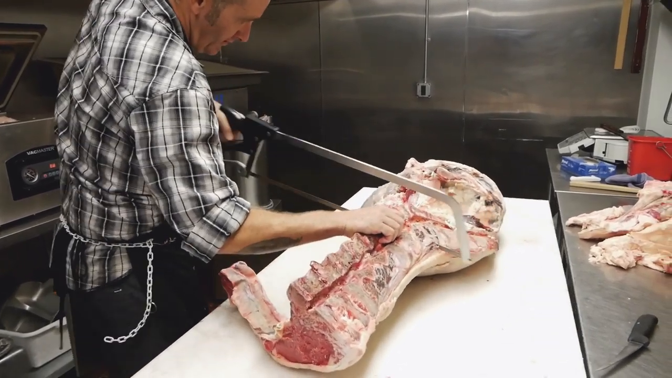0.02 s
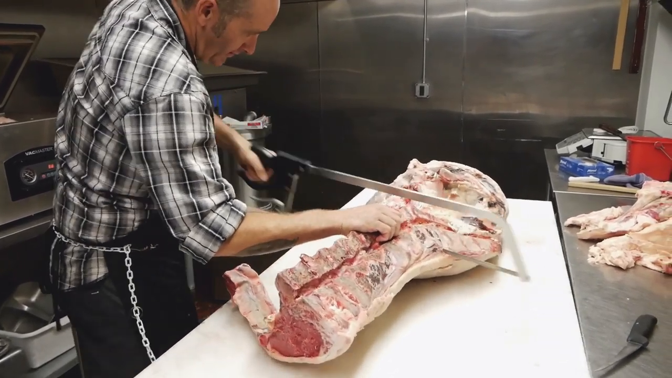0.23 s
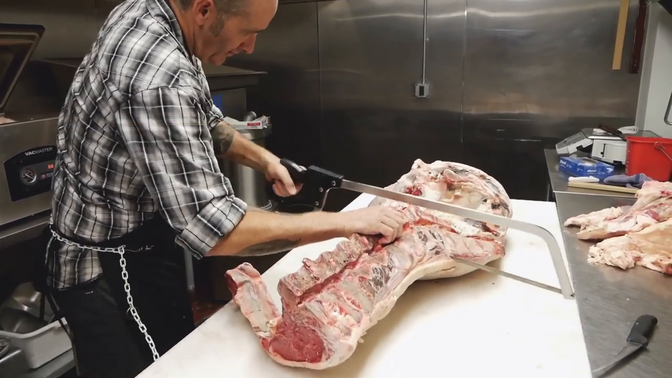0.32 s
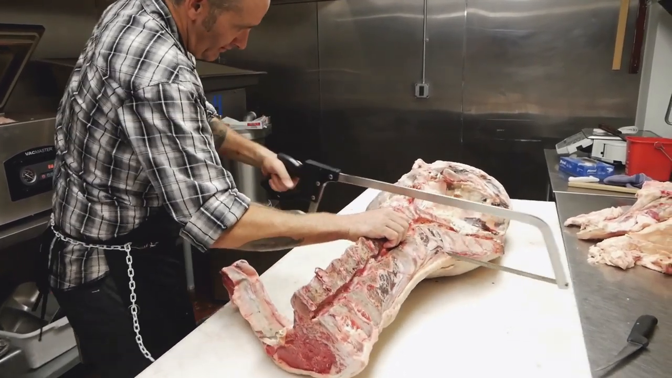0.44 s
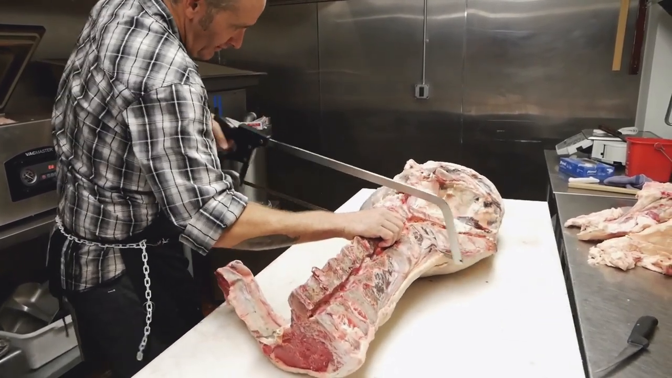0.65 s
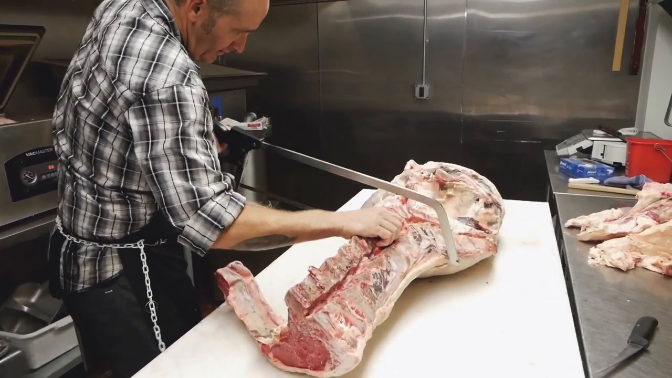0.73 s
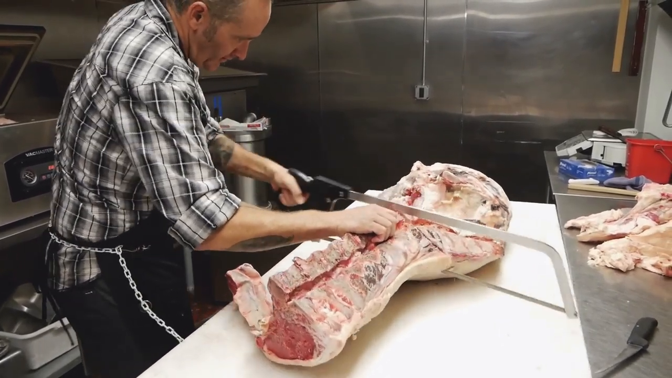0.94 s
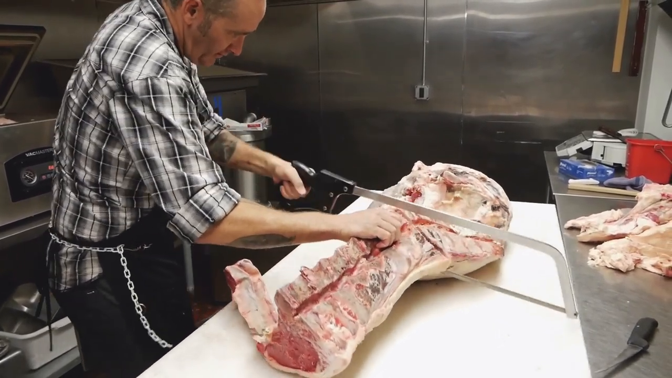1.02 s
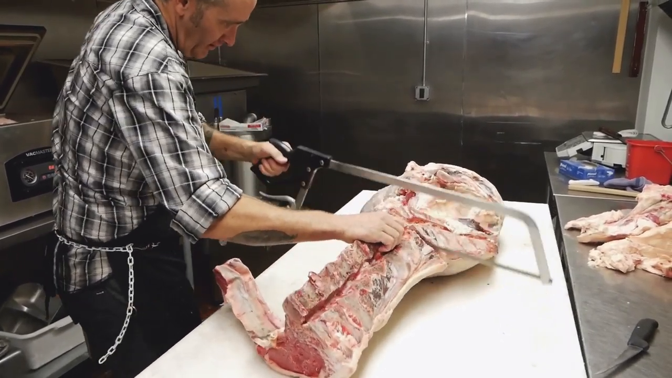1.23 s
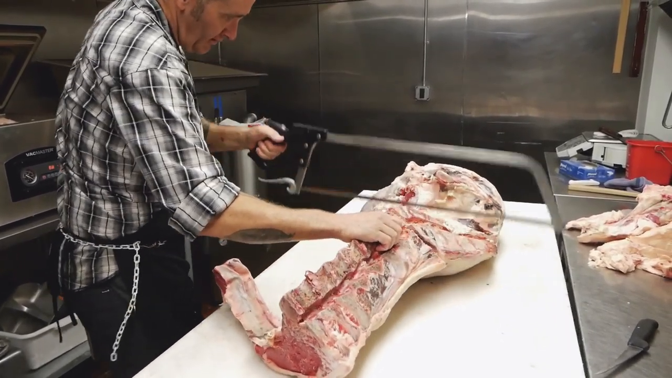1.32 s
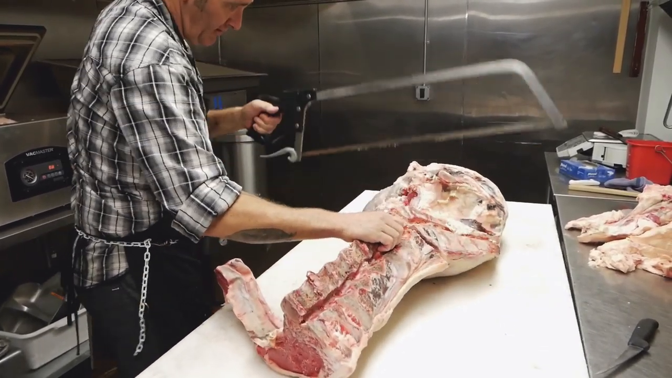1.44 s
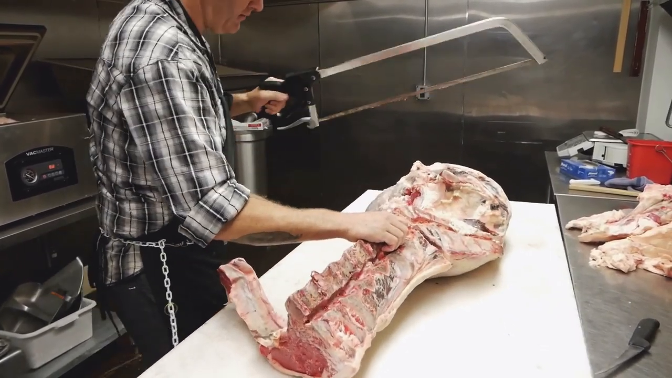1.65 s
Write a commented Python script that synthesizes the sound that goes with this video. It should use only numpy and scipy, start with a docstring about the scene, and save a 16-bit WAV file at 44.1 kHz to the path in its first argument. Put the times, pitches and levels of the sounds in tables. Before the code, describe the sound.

A hand saw cuts bone, close and nearly mono, in a hard steel-walled room with steady low cooler hum. A faint drag opens; from 0.2 to 0.4 seconds a loud, crunchy push rings and squeals. A sharp snag cracks at 0.44, then light gritty skating until 0.8. A second, brighter but weaker push fades into a short knock at 1.02. A soft sinking scuff comes at 1.52.

```python
"""In a steel-walled butcher's room a hand saw cuts through bone: two loud pushes, each after a light pull back.
The teeth strike at a rate set by the blade's speed: noise bursts crunch the bone, resonances ring the blade
and low noise shakes the carcass. The blade catches and squeals in short tones, then breaks through with a
knock of decaying modes and is lifted away; a soft scuff of noise and a sinking tone follows.
Coolers run throughout as coloured noise and wavering tones; a noise tail answers for the room."""
import sys
import numpy as np
from scipy import signal
from scipy.fft import rfft, irfft, next_fast_len
from scipy.io import wavfile
from scipy.ndimage import uniform_filter1d, map_coordinates

SR = 44100
rng = np.random.default_rng(int(sys.argv[2]) if len(sys.argv) > 2 else 0)


def master(y):
    """Save y as 16-bit WAV."""
    cut = np.clip(np.atleast_2d(y).T, -1, 1)
    pcm = np.round(cut * 32767)  # scale
    wavfile.write(sys.argv[1], SR, pcm.astype(np.int16))


N = 74970


def amp(db):
    """Decibels to gain."""
    return 10 ** (np.asarray(db) / 20)


def unit(x):
    """Scale to rms 1."""
    return x / np.sqrt(np.mean(x ** 2) + 1e-20)


def along(points, hz):
    """Read (f/Hz, value) points along a log frequency axis."""
    f, v = np.transpose(points)
    return np.interp(np.log(hz + 1), np.log(f + 1), v)


def curves(rows):
    """One value per sample for each column after the time."""
    s, *cols = np.transpose(rows)
    return [np.interp(np.arange(N) / SR, s, c) for c in cols]


def wobble(rate):
    """A smooth random curve with rate knots a second."""
    knots = rng.standard_normal(int(N * rate / SR) + 4)
    return map_coordinates(knots, [np.arange(N) * rate / SR])


def filtered(x, response):
    """Filter x by a response given as a function of frequency."""
    m = next_fast_len(N + SR // 2)
    return irfft(rfft(x, m) * response(np.fft.rfftfreq(m, 1 / SR)), m)[..., :N]


def coloured(x, points):
    """Shape x by (f/Hz, level/dB) points, at rms 1."""
    return unit(filtered(x, lambda hz: amp(along(points, hz))))


def resonance(f, hz, width_hz):
    """Frequency response of one resonant mode."""
    return 1j * f * width_hz / (hz * hz - f * f + 1j * f * width_hz)


def decay(start, t60):
    """Silence, then a sudden start that dies away by 60 dB in t60 seconds."""
    t = np.arange(N) / SR - start
    return (t >= 0) * amp(-60 * np.maximum(t, 0) / t60)


def ring(start, hz, t60):
    """One struck mode: a decaying sine."""
    return decay(start, t60) * np.sin(2 * np.pi * hz * (np.arange(N) / SR - start))


def swell(s, hz, width_s):
    """A tone that rises and fades around a moment."""
    t = np.arange(N) / SR - s
    return np.exp(-(t / width_s) ** 2) * np.sin(2 * np.pi * hz * t + .5 * wobble(160))


def coolers():
    """Fan rush as coloured noise, and motor tones that waver in level and phase."""
    # fan spectrum: f/Hz, level/dB
    fan_colour = [(30, 1), (45, -4.5), (100, -1.5), (140, 2), (230, 2.5), (340, -4.5), (420, -5.5),
                  (500, -14), (700, -15.5), (2600, -27.5), (3600, -34.5), (5000, -34), (9000, -45.5)]
    # motor tones: f/Hz, level/dB
    motor_tones = [(209, -46.5), (236, -47), (411, -51.5)]
    fan_db, waver_db = -41.5, 1
    t = np.arange(N) / SR
    hum = np.zeros(N)
    for hz, db in motor_tones:
        level = amp(db + waver_db * wobble(9.5))
        hum += level * np.sin(2 * np.pi * hz * t + 0.8 * wobble(9))
    return amp(fan_db) * coloured(rng.standard_normal(N), fan_colour) + hum


def room(x):
    """The hard walls answer with a noise tail whose treble dies first."""
    # reverberation: f/Hz, t60/s
    reverb_times = [(4000, 0.5), (8000, 0.44), (14000, .25)]
    room_db, first_wall_s = -6, 0.0024
    hz, t, z = signal.stft(rng.standard_normal(SR * 2 // 3), SR, nperseg=256)
    fade = amp(-60 * t / along(reverb_times, hz)[:, None])
    tail = signal.istft(z * fade, SR, nperseg=256)[1]
    tail = tail * (np.arange(len(tail)) / SR > first_wall_s)
    return amp(room_db) * signal.fftconvolve(x, tail / np.linalg.norm(tail))[:N]


def lift():
    """A soft noise scuff with a sinking hollow resonance as the saw is raised."""
    # scuff envelope: t/s, level/dB
    scuff = [(1.512, -67), (1.519, -43), (1.545, -39), (1.575, -45), (1.61, -53), (1.7, -62.5)]
    # scuff spectrum: f/Hz, level/dB
    scuff_colour = [(300, 2.5), (900, 2), (1200, -13), (1650, -7), (2900, -15.5), (4500, -9.5), (6500, -12),
                    (13000, -30.5)]
    start_hz, octaves_per_s, hollow_db = 1000, 8, -6
    level_db, = curves(scuff)
    sinking_s = np.maximum(np.arange(N) / SR - scuff[1][0], 0)
    hz = start_hz * 2 ** (-octaves_per_s * sinking_s)
    hollow = unit(wobble(290) * np.sin(2 * np.pi * np.cumsum(hz) / SR))
    return amp(level_db) * (coloured(rng.standard_normal(N), scuff_colour) + amp(hollow_db) * hollow)


def knock():
    """The blade breaks through the bone: struck modes, their onset softened by the meat, and a noise crack."""
    # modes of the blow: f/Hz, level/dB, t60/s
    knock_modes = [(777, 1, 0.027), (1043, -5, 0.042), (1220, -2.5, 0.028), (1700, 1, 0.016),
                   (2130, -1, 0.013)]
    start_s, knock_db, crack_db, rise_s = 1.024, -20.5, -7, 0.0005
    modes = np.zeros(N)
    for k, (hz, db, t60) in enumerate(knock_modes):
        modes += (-1) ** k * amp(db) * ring(start_s, hz, t60)  # alternating polarity
    rise = 1 - np.exp(-np.maximum(np.arange(N) / SR - start_s, 0) / rise_s)
    crack_colour = [(300, -0.5), (2000, 6), (5500, 13.0), (9000, -28)]  # f/Hz, level/dB
    crack = decay(start_s, 0.016) * coloured(rng.standard_normal(N), crack_colour)
    return amp(knock_db) * (rise * modes + amp(crack_db) * crack)


def catches():
    """A tooth snags and snaps free: a crack of band-limited noise and a very short ring."""
    # snags: t/s, level/dB, ring f/Hz, relative ring level/dB, top of the crack f/Hz
    snags = [(0.4396, -8, 2380, -2.5, 12700), (0.716, -23, 6300, -6, 10000)]
    t60_s, crack_low_hz = 0.0066, 2800
    out = np.zeros(N)
    for s, db, hz, ring_db, top_hz in snags:
        def band(f):
            return (f / np.hypot(f, crack_low_hz)) ** 2 / np.sqrt(1 + (f / top_hz) ** 8)
        crack = unit(filtered(rng.standard_normal(N), band))
        out += amp(db) * (.5 * decay(s, t60_s) * crack + amp(ring_db) * ring(s, hz, t60_s))
    return out


def pulls():
    """Drawn back, the teeth skate lightly over the cut: gritty coloured noise."""
    # envelope of the light pulls: t/s, level/dB
    pull_levels = [(0, -45.5), (.07, -53.5), (.11, -69), (.40, -53), (.45, -33), (.50, -43.5), (.56, -37),
                   (.61, -45), (.638, -33.5), (.68, -41.5), (.73, -45), (.77, -56.5), (.80, -36),
                   (.83, -76)]
    # skating spectrum: f/Hz, level/dB
    pull_colour = [(300, -36), (1700, -13.5), (2300, -1), (2850, -6), (3500, 0.5), (5500, 1), (8000, -4),
                   (12500, -7.5), (15500, -24.5)]
    level_db, = curves(pull_levels)
    grit = rng.standard_normal(N) * amp(3.0 * wobble(600))
    return amp(level_db) * coloured(grit, pull_colour)


def squeals():
    """The blade grips, sticks and slips: brief tones swell and fade on one mode after another."""
    # squeals: t/s, f/Hz, peak level/dB, half-length/s (down to 1/e)
    grips = [(0.267, 3677, -10.5, 0.0059), (.282, 3920, -12, 0.0029), (0.318, 1265, -21.5, 0.0069),
             (.775, 3790, -37.5, .003), (0.804, 5006, -31, 0.0029), (0.8714, 3720, -10.5, 0.0014),
             (0.885, 3850, -22, 0.0012), (.891, 1826, -17.5, 0.0034), (1.623, 4255, -51, 0.012)]
    return sum(amp(db) * swell(s, hz, width_s) for s, hz, db, width_s in grips)


def bite():
    """The bone's knock as the first push digs in: one struck mode."""
    return amp(-26.5) * ring(start=.228, hz=510, t60=.1)


def teeth(rate):
    """One uneven strike per tooth, and the burst of crunch noise that follows each."""
    jitter_s, scatter_db = .00002, 1.5  # random timing and strength of the strikes
    chip_s = 0.00057  # time in which a crunch's energy falls to 1/e
    turns = np.cumsum(rate) / SR  # teeth passed so far
    chance = rng.standard_normal((2000, 2))[:int(turns[-1])]
    at = np.interp(np.arange(len(chance)), turns, np.arange(N)) + jitter_s * SR * chance[:, 0]
    at = np.clip(np.round(at), 0, N - 1).astype(int)
    strength = amp(scatter_db * chance[:, 1]) / np.sqrt(rate[at])  # keeps the power even as the rate changes
    strikes = np.bincount(at, strength, N)
    energy = signal.lfilter([1], [1, -np.exp(-1 / (chip_s * SR))], strikes ** 2)
    crunch = unit(np.sqrt(energy) * rng.standard_normal(N))
    clean = unit(strikes - uniform_filter1d(strikes, size=200))  # without the slow drift
    return clean, crunch


def bone_rasp(k, rate, level_db, crunch):
    """The crunch roughened by the bone's uneven hardness; it dulls as the blade slows."""
    # rasp spectrum, one list per push: f/Hz, level/dB
    rasp_colours = [
        [(300, -32.5), (900, -14.5), (1800, -8), (2700, -1), (3250, -12), (3550, 2), (4400, 0), (5500, 1.5),
         (8000, -1.5), (12500, -3), (15500, -15)],
        [(300, -22), (900, -17), (1800, -3.5), (2700, -2), (3250, -3), (3550, -1), (4400, 0.5), (5500, 1),
         (8000, -1.5), (12500, -6), (15500, -20)],
    ]
    grit_db, treble_hz, treble_db_per_octave = -0.5, 9400, 8.5
    gritty = crunch * amp(grit_db * wobble(400))
    rasp = amp(level_db) * coloured(gritty, rasp_colours[k])
    treble = filtered(rasp, lambda f: 1 - 1 / (1 + (f / treble_hz) ** 6))
    treble_gain = amp(treble_db_per_octave * np.log2(rate / rate.max()))
    return rasp + (treble_gain - 1) * treble


def blade_ring(k, level_db, strikes, rasp):
    """Steel resonances driven by noise and tooth strikes, and high narrow modes rung by the rasp."""
    # blade resonances: f/Hz, width/Hz, first push level/dB, second push level/dB
    blade_modes = [(1490, 50, -26, -4), (2167, 90, -18, -3), (3575, 30, 4, 0.5), (3626, 54, 3, -1.5),
                   (3844, 48, 1, -1), (4153, 70, -1.5, -2)]
    # high, narrow blade modes: f/Hz
    high_modes = [4893, 5510, 5940, 6750, 8003, 12600]
    strike_db, high_width_hz, high_db = -6, 22, 1

    def steel(f):
        return sum(amp(dbs[k]) * resonance(f, hz, width) for hz, width, *dbs in blade_modes)

    def overtones(f):
        return sum(resonance(f, hz, high_width_hz) for hz in high_modes)

    drive = rng.standard_normal(N) + amp(strike_db) * strikes
    return amp(level_db) * unit(filtered(drive, steel)) + amp(high_db) * filtered(rasp, overtones)


def tooth_whine(rate, level_db):
    """A tone at the tooth rate, unsteady in level and phase."""
    phase = 2 * np.pi * np.cumsum(rate) / SR + 0.54 * wobble(220)
    return amp(level_db + 2.2 * wobble(140)) * np.sin(phase)


def carcass_shake(rate, level_db, strikes):
    """The carcass shakes as low noise and strikes; the table thuds only near full blade speed."""
    # carcass spectrum: f/Hz, level/dB
    carcass_colour = [(40, -16.5), (130, -11), (230, 4), (340, -5.5), (480, 1), (830, -2.5), (1280, -5.5),
                      (1700, -8), (4000, -41)]
    strike_db, thud_hz, thud_db, thud_power = -4.5, 65.4, -7.5, 6
    drive = rng.standard_normal(N) + amp(strike_db) * strikes
    shake = amp(level_db) * coloured(drive, carcass_colour)
    thud = unit(filtered(rng.standard_normal(N), lambda f: resonance(f, thud_hz, thud_hz) ** 2))
    return shake + amp(level_db + thud_db) * (rate / rate.max()) ** thud_power * thud


def pushes():
    """The teeth crunch the bone and shake the carcass; the blade rings and whines at the tooth rate."""
    # one list per push: t/s, tooth rate f/Hz, rasp level/dB, carcass level/dB,
    # blade ring level/dB, tooth tone level/dB
    strokes = [
        [(.168, 300, -54, -65, -73, -84), (.195, 378.1, -35, -60.5, -54.5, -56),
         (.226, 520.2, -25, -60, -32, -53), (.234, 592.7, -21, -51, -26.5, -27.5),
         (.263, 644.6, -15, -27, -25, -27), (.285, 665, -15, -27.5, -19.5, -23),
         (.314, 642.4, -18, -23.5, -21, -35), (.335, 512, -18.5, -27, -25, -34),
         (.36, 376, -24.5, -38, -32, -27), (.41, 217, -33.5, -63, -60, -76), (.46, 120, -49, -65, -71, -78)],
        [(.785, 300.1, -58, -72, -74, -79), (.805, 419.8, -37.5, -57, -59, -74),
         (.835, 600.5, -26, -46, -34.5, -54), (.87, 721.5, -22, -31, -23, -46),
         (.895, 734.6, -20, -30, -32, -51), (.935, 702.2, -27, -29.5, -42, -31),
         (.985, 567, -30.5, -43, -54, -52.5), (1.02, 397.5, -33.5, -39, -50.5, -56),
         (1.05, 306.3, -58, -34.5, -71, -67.5)],
    ]
    grind, sing, t = np.zeros(N), np.zeros(N), np.arange(N) / SR
    for k, stroke in enumerate(strokes):
        rate, rasp_db, carcass_db, ring_db, tone_db = curves(stroke)
        strikes, crunch = teeth(rate)
        rasp = bone_rasp(k, rate, rasp_db, crunch)
        blade = blade_ring(k, ring_db, strikes, rasp)
        whine = tooth_whine(rate, tone_db)
        carcass = carcass_shake(rate, carcass_db, strikes)
        cutting = (t > stroke[0][0]) & (t < stroke[-1][0])
        grind += cutting * (rasp + carcass)
        sing += cutting * (blade + whine)
    return grind, sing


def scene():
    """Nearly mono; only the room's answer spreads a little."""
    # spread of the room's side signal: f/Hz, level/dB
    side_colour = [(150, -3), (1000, -4.5), (2200, -39), (5000, 7.5)]
    width_db = -20.5
    sing_room_db = -6.5  # ring, whine, squeals and bite stir the room less than the rasp
    grind, sing = pushes()
    sing = sing + squeals() + bite()
    skate = pulls() + catches()
    release = knock() + lift()
    into_room = [grind + amp(sing_room_db) * sing, skate, release]
    direct = grind + sing + skate + release
    mid = direct + sum(room(x) for x in into_room) + coolers()
    side = amp(width_db) * filtered(room(sum(into_room)), lambda hz: amp(along(side_colour, hz)))
    return np.array([mid + side, mid - side])


def record(dry):
    """A faint coloured noise, independent in each channel, lies under everything; peaks round off, the top is cut."""
    # faint noise spectrum: f/Hz, level/dB
    noise_colour = [(500, -1.5), (2000, -14.5), (4500, -1), (15000, -2.5)]
    noise_db, ceiling, top_hz = -63.5, .8, 15650
    x = dry + amp(noise_db) * coloured(rng.standard_normal((2, N)), noise_colour)
    x = x / (1 + (x / ceiling) ** 8) ** (1 / 8)
    return filtered(x, lambda hz: hz < top_hz)


dry = scene()
out = record(dry)
master(out)
```